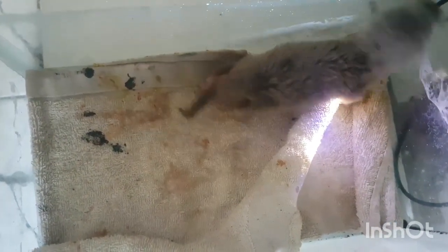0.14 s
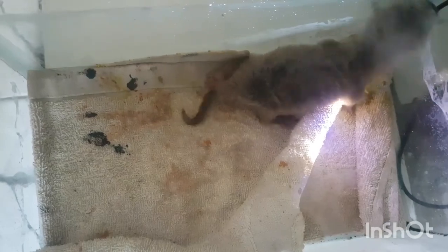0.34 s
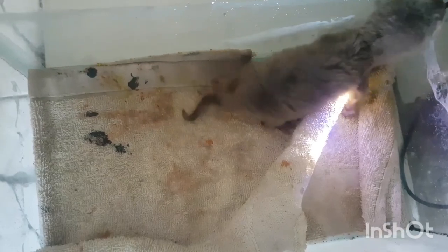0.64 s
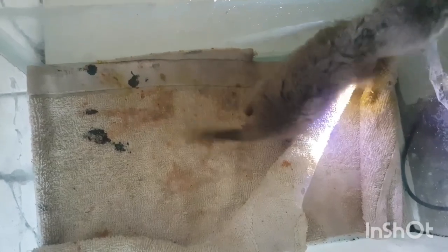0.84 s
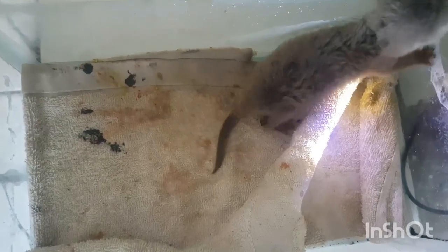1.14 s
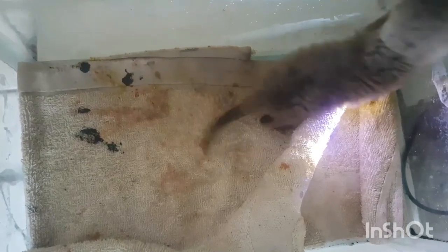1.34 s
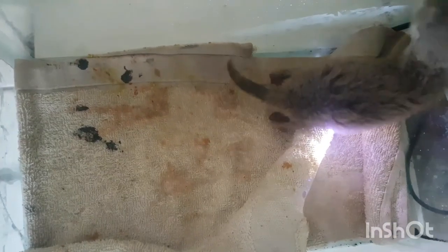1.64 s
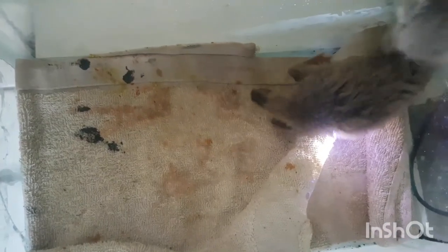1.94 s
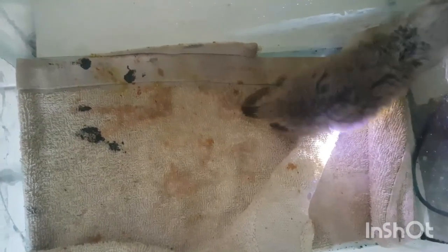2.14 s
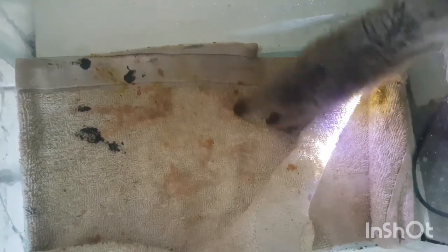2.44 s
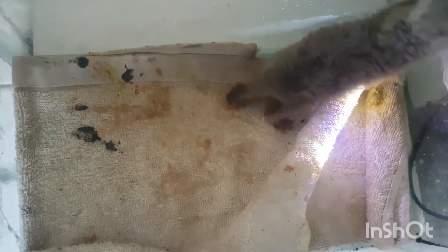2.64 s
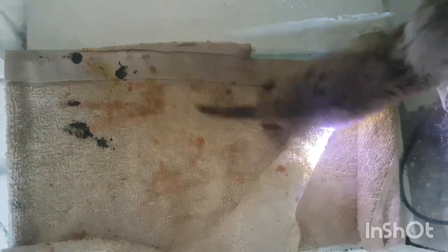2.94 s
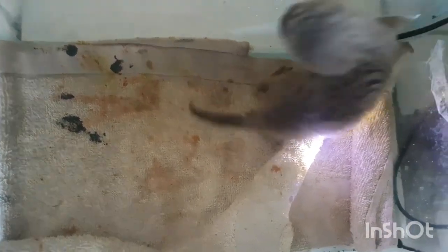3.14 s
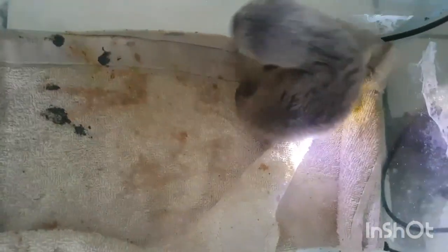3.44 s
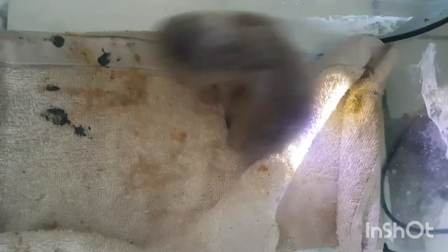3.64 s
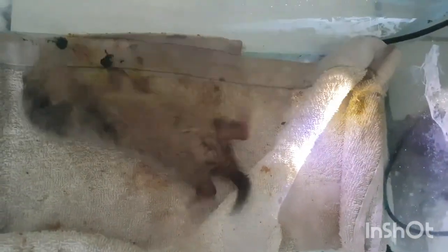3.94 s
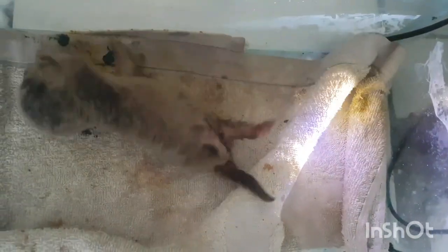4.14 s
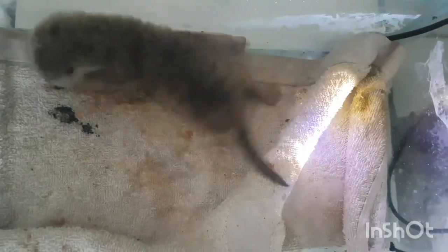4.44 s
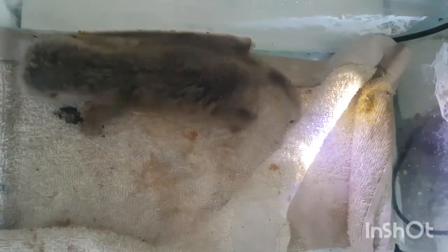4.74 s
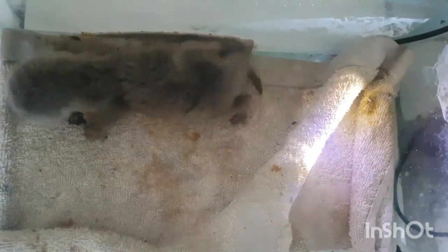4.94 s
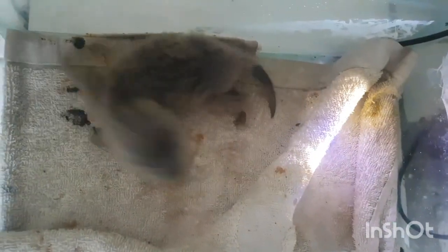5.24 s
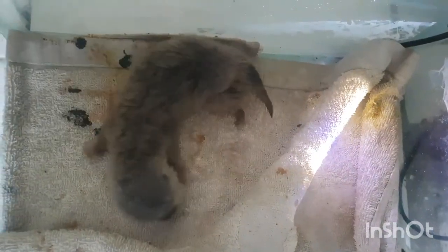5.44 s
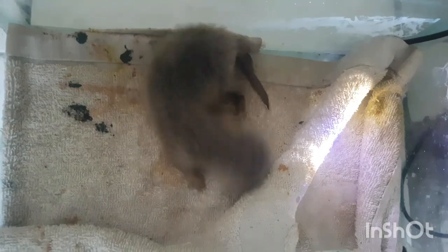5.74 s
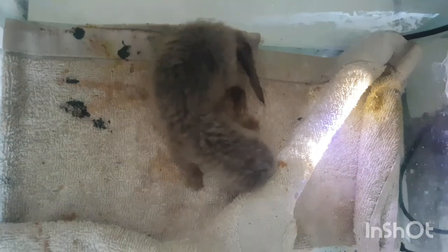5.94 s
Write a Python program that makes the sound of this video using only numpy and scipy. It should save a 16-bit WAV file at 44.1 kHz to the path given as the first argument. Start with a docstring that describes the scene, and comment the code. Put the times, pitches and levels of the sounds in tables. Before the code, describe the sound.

A low, soft room hum runs throughout. Very close, mostly right of centre, a young otter pup squeaks in a plastic tub whose walls give a short, hard ring. From 0.15 to 2.7 seconds come seven loud calls, roughly every 0.4 seconds, each 0.15 to 0.3 seconds long: a raspy start, a fast arch towards a piercing whistle, then a fall into a shrill, buzzing whine. The sixth stays lower. At 3.0 a lower, rough whine sags, and at 3.5 a fainter, deeper one fades; soft towel scuffs and dull bumps lie around 3.3 to 3.5. Tiny claw ticks come at 3.8. At 4.2 a bright squeak soars and drops, capped by a very brief loud peep, then a small bump at 4.53. Claws tick from 4.8 to 5.2. Another whistling squeak falls at 5.2, with a faint scuff at 5.4, followed by shorter squeaks at 5.55, 5.83 and 6.04, the last two hoarse.

```python
"""In a plastic tub lined with a towel, an otter pup squeaks again and again, close to the microphone.
Most squeaks start with a rasp, arch up towards a whistle and fall back into a shrill, buzzing whine:
gliding harmonics and puffs of air pass through a throat and a mouth that opens and shuts.
The tub walls reflect the voice, and shaped noise makes the low room hum, the towel scuffs with
their soft bumps, and the claw ticks."""
import sys
import numpy as np
from scipy import signal
from scipy.fft import rfft, irfft
from scipy.io import wavfile
from scipy.ndimage import uniform_filter1d

SR = 44100
rng = np.random.default_rng(int(sys.argv[2]) if len(sys.argv) > 2 else 0)


def bounce(signal):
    """Save signal as a 16-bit WAV file at the path given by the first command-line argument."""
    frames = np.transpose(np.atleast_2d(signal))
    limited = np.clip(frames, -1, 1)
    pcm = np.round(limited * 32767).astype(np.int16)
    wavfile.write(sys.argv[1], SR, pcm)


N = 268128

# room hum, relative spectrum: (f/Hz, level/dB)
ROOM = [(15, -83), (25, -29), (59, -4), (212, 1.5), (363, -12.5), (416, -10.5), (560, -18.5), (695, -16.5),
        (1480, -20.5), (2990, -22.5), (5280, -35.5), (6050, -40.5), (7920, -44.5), (9320, -46.5),
        (16000, -41)]
ROOM_DB = -47.5
# likeness of the hum left and right, below 0 counts as none: (f/Hz, likeness)
ROOM_SAME = [(60, 0.77), (180, 1), (550, 0.54), (1650, -0.46), (4970, 0.097), (15000, 0.18)]
# balance of the hum: (f/Hz, left-right level/dB)
ROOM_SIDE = [(60, -2.5), (180, -5.5), (550, -8), (1650, -10), (4970, -5.5), (15000, 5)]

# pitch curve of each squeak, from its start to its end: (t/s, f/Hz)
PITCH = [
    [(.149, 1310), (.161, 1677), (.169, 4400), (.201, 6540), (.254, 4900), (.281, 3130), (.305, 3746),
     (.35, 1812), (.379, 1536)],
    [(.538, 2360), (.551, 4700), (.563, 5485), (.603, 5190), (.645, 2668), (.668, 1918), (.689, 1660)],
    [(.875, 5520), (.888, 5990), (.924, 4980), (.955, 2416), (.972, 1969), (.998, 2450), (1.025, 1820),
     (1.06, 1509), (1.089, 1685)],
    [(1.247, 2156), (1.261, 1427), (1.286, 3835), (1.306, 3880), (1.335, 2285), (1.37, 1596), (1.423, 1410),
     (1.475, 1548), (1.517, 1392)],
    [(1.694, 1722), (1.716, 1723), (1.73, 4166), (1.762, 5260), (1.792, 4616), (1.826, 1900), (1.843, 1415),
     (1.875, 1362), (1.898, 1540)],
    [(2.054, 2168), (2.069, 1431), (2.098, 2076), (2.115, 2286), (2.145, 1646), (2.17, 1382), (2.203, 1294),
     (2.248, 1382), (2.265, 1890)],
    [(2.406, 2114), (2.42, 1450), (2.447, 1700), (2.47, 3860), (2.503, 4840), (2.545, 2083), (2.565, 1547),
     (2.605, 1395), (2.628, 1456), (2.678, 1435)],
    [(2.992, 1075), (3.028, 1002), (3.042, 842), (3.105, 892), (3.155, 598), (3.185, 850), (3.2, 806)],
    [(3.484, 836), (3.535, 650), (3.555, 659), (3.575, 467), (3.632, 419)],
    [(4.219, 1320), (4.23, 956), (4.25, 2300), (4.279, 3910), (4.291, 5000), (4.32, 5370), (4.337, 4740),
     (4.368, 2462), (4.442, 1518), (4.468, 1990)],
    [(4.469, 2700), (4.485, 2565)],
    [(5.211, 4850), (5.228, 5610), (5.277, 5250), (5.302, 3450), (5.318, 2234), (5.345, 1610), (5.38, 1324),
     (5.419, 1072)],
    [(5.551, 2018), (5.562, 1367), (5.578, 1582), (5.63, 1770), (5.678, 1323), (5.687, 1900)],
    [(5.829, 1725), (5.838, 1487), (5.885, 1460), (5.913, 1780)],
    [(6.037, 1840), (6.048, 1383), (6.062, 1580), (6.079, 1450)],
]
# voicing of each squeak: (level/dB, swell from start to end/dB, extra level in the whistle/dB,
# roughness 0-1, added roughness at the start, added roughness at the end, hoarseness 0-1,
# brightness with the mouth widest/dB, share of the length at which it is widest, topmost treble/dB,
# low resonance of a half-shut mouth/dB, mouth opening as a factor on the throat's frequencies)
SQUEAKS = [ (-21.5, 1.5, 1, 0.29, .5, 0, .03, 16.5, 0.79, -0.5, 1, 1.084),
           (-15.5, 3.5, 4, 0.22, 0.26, 0.059, 0, 22, 0.18, -1.5, 1, 1.027),
           (-17, 6, 4, 0.08, 0, 0.51, 0.15, 14, 0.17, 5, -1.5, 1),
           (-16, 2, 7, 0.05, .45, 0.2, 0, 11, 0.25, 13.5, -6, 1.01),
           (-19.5, -0.5, 1, 0.18, 0.58, 0.74, 0, 14.5, 0.62, 10, -3, 0.994),
           (-19.5, -2.5, 2, .27, 0.55, .4, 0, 8, 0.64, 7.5, -1.5, 1.025),
           (-17, 1.5, 4.5, 0.2, 0.15, 1, 0, 15, 0.17, 0, -5.5, 1.038),
           (-22.5, -5.5, 6, 0.24, 0.38, 1, 0.01, 23, 0.75, -1.5, -2.5, 1),
           (-30, -10, 0, 0.41, 0.15, 0.59, 0.02, 15, 0.12, -3, 13.5, 1.123),
           (-16.5, 1.5, 3.5, 0, 0.79, 0.57, .05, 12, 0.2, -15, -0.5, 1.053),
           (-7.5, 1, 1, 0, 0, 0, 0.1, -29, 0.6, -10, 2, 0.59),
           (-23.5, 2, 4, .14, 0, .8, 0.1, 15, 0.41, -3, 3, 1.09),
           (-22.5, -9, 4, 0.21, 0.32, 1, 0.03, 7, 1, 9, 6, 1.137),
           (-24, -6.5, -9, 0.9, 0, 0.22, 1, -13, 1, 26, 12.5, .96),
           (-20, 0.5, -6, 0.7, 0.54, 0.12, .8, 5, 1, 2, 14, 0.98), ]
# where the head points in each squeak:
# (left-right level/dB at each of the four FACING_HZ, lead of the left microphone t/ms)
FACING = [(-13.5, -12, -4.5, -10, 0), (-15, -10, -7.5, -3.5, .34), (-15, -10.5, -2, -9, .3),
          (-13.5, -12.5, -8.5, -11, -.05), (-14, -12.5, -11, -2.5, .03), (-16.5, -16.5, -4, -12, -0.34),
          (-17.5, -18, -8, -14, -.05), (-16.5, -7.5, 3, -1.5, .05), (-13, -2, -4, 3, .18),
          (-14.5, 1, 9, -2.5, .36), (-5, -5, 14, -2, .36), (-24, -6, -7, -4, .18), (-16, -7, -8, -3, .18),
          (-21, -10, 5, -2, .18), (-22, -5, -1, -4, .18)]
# frequencies of those four balances: (f/Hz)
FACING_HZ = [2000, 4260, 5700, 14200]
# colour of throat and mouth for the tone: (f/Hz, level/dB)
THROAT = [(500.0, -8), (900.0, -19), (1400.0, -17), (2250.0, -6), (2900.0, -3.5), (3500.0, -1.5),
          (4400.0, 3), (5300.0, -15), (6500.0, -12.5), (8000.0, -20), (10500.0, -17.5), (13500.0, -15),
          (15800.0, -30.5)]
# their colour for the rasp of air: (f/Hz, level/dB)
RASP = [(300, -13), (900, -4), (1200, -49.5), (1600, -4.5), (2200, 5.5), (3000, -3), (4300, 8), (5500, -6),
        (8000, -4), (10500, -9), (13500, -12), (16000, -27.5)]

# reflections from the tub walls, one list per microphone, left then right:
# (delay t/ms, gain against the direct sound)
WALLS = [
    [(.52, .4), (1.15, -.36), (1.9, .25), (3.1, .16), (4.6, -.09)],
    [(.7, .24), (1.4, .2), (2.3, -.16), (3.6, .1), (5.2, .06)],
]
# dying away of the room's tail: (f/Hz, t60/s)
RING = [(1200, 0.99), (3200, 0.64), (8400, 0.51), (15000, 0.54)]
# colour of that tail: (f/Hz, level/dB)
RING_COLOUR = [(800, -7), (1600, -4), (4500, -7), (5800, 0), (8000, -6), (13000, -20.5)]
# the shorter ring of the tub, on top of the room's tail
TUB_T60, TUB_DB = 0.25, 10  # s, dB

# scuffs of body and paws on the towel:
# (start t/s, end t/s, level/dB, dull above f/Hz, share of the time spent fading)
SCUFFS = [(3.258, 3.409, -52, 1170, 0.26), (3.398, 3.54, -55, 1120, 0.3), (4.529, 4.57, -40.5, 1300, 0.073),
          (5.423, 5.573, -46.5, 740, 0.39)]
# soft bumps of the body on the tub floor: (start t/s, end t/s, level/dB, f/Hz)
BUMPS = [(3.275, 3.376, -40.5, 184), (3.42, 3.496, -44.5, 209), (4.534, 4.559, -39, 480),
         (5.42, 5.559, -47, 171)]
GRAIN = .3  # depth of the cloth's unevenness
# claws ticking on the tub: (t/s, peak level before panning/dB, ring f/Hz, left-right level/dB)
TICKS = [(3.7973, -34.5, 1695, -11.5), (3.825, -37.5, 1830, -16), (4.8407, -31, 1760, -22),
         (4.9846, -30.5, 2770, -10), (5.0383, -36.5, 3000, -7), (5.053, -34.5, 2150, -19),
         (5.175, -36, 2970, -11)]

# upper limit of the voice's harmonics and of the recorder; where the topmost treble begins
EDGE_HZ, TOP_HZ = 15900, 12000
# unsteadiness of the folds: share of pitch at rest, share added under strain, loudness under strain
JITTER, STRAIN_JITTER, SHIMMER, LEAST_ROUGH = .004, .03, .7, .1
# spread of the upper harmonics: amount, Hz that scales it, rate as a share of the pitch
BLUR, BLUR_HZ, BLUR_RATE = .68, 1900, .3
# slower beat of the folds: depth at full hoarseness, rate as a share of the pitch
BEAT_DEPTH, BEAT_RATE = 1.7, .31
# the mouth opens and closes once a squeak: how much duller and quieter it is when shut
SHUT_DULL_DB, SHUT_QUIET_DB = 16, 1.5
# breath pressure builds and drops: dB lost at the very edge, s
BUILD_DB, BUILD_S, DROP_DB, DROP_S = 7.5, 0.024, 13, .006
# how long the folds rasp while they start and stop
START_S, STOP_S = 0.033, 0.016
# the folds catch between buzz and whistle: added roughness, pitch Hz, width in octaves, dB lost
BREAK_ROUGH, BREAK_HZ, BREAK_OCTAVES, BREAK_DB = 0.34, 2830, 0.26, 3
# about where the whistle takes over, and the share of roughness lost in it
WHISTLE_HZ, WHISTLE_CLEAN = 4700, 0.34
# share by which loudness follows the harmonics into and out of the throat's resonances
FLARE = 0.47
# extra flare of the fundamental at the throat's sharpest resonance: dB, Hz, width Hz
PEAK_DB, PEAK_HZ, PEAK_WIDTH_HZ = 2.5, 4630, 100
# slow waver of each harmonic by itself: rms dB, rate Hz
WAVER_DB, WAVER_HZ = 1.48, 35


def amp(db):
    """Decibels to gain."""
    return 10 ** (np.asarray(db) / 20)


def unit(x):
    """Scales to rms 1."""
    return x / np.sqrt(np.mean(x ** 2) + 1e-20)


def read(points, hz):
    """Reads a spectrum on a log-frequency axis."""
    f, value = np.transpose(points)
    return np.interp(np.log(hz + 1), np.log(f + 1), value)


def add(mix, s, sound):
    """Adds a stereo sound at time s."""
    part = mix[:, max(round(s * SR), 0):][:, :sound.shape[1]]
    part += sound[:, :part.shape[1]]


def sides(db):
    """Left and right gains of mean power 1 for a left-right difference in dB."""
    gains = np.array([amp(db / 2), amp(-db / 2)])
    return gains / np.sqrt(np.mean(gains ** 2, 0))


def noise(size, shape):
    """Noise of rms 1 whose spectrum follows shape(Hz)."""
    spectrum = rfft(rng.standard_normal(size))
    return unit(irfft(spectrum * shape(np.fft.rfftfreq(size, 1 / SR)), size))


def wobble(size, hz):
    """Random unsteadiness of rms 1, mostly below the given rate."""
    return noise(size, lambda f: 1 / (1 + (f / hz) ** 4))


def background():
    """Steady low room hum: shaped noise, most alike in both microphones at the low end."""
    f = np.fft.rfftfreq(N, 1 / SR)
    shared, other = (rfft(noise(N, lambda hz: amp(read(ROOM, hz)))) for _ in range(2))
    same = np.clip(read(ROOM_SAME, f), 0, 1)
    right = same * shared + np.sqrt(1 - same ** 2) * other
    hum = irfft(np.array([shared, right]) * sides(read(ROOM_SIDE, f)), N)
    return amp(ROOM_DB) * hum


def glide(points, t):
    """A smooth pitch curve through (s, Hz) points that levels off at each turn."""
    s, hz = np.transpose(points)
    y = np.log(hz)
    span = np.maximum(np.diff(s), 1e-4)
    slope = np.diff(y) / span
    before, after = np.r_[slope[0], slope], np.r_[slope, slope[-1]]
    # opposite slopes cancel, so the tangent is flat at a turn
    tangent = (before * abs(after) + abs(before) * after) / (abs(before) + abs(after) + 1e-9)
    i = np.clip(np.searchsorted(s, t) - 1, 0, len(span) - 1)
    u = (t - s[i]) / span[i]
    bend = (1 - u) * ((tangent[i] - slope[i]) * (1 - u) - (tangent[i + 1] - slope[i]) * u)
    return np.exp(y[i] + (t - s[i]) * (slope[i] + bend))


def treble(hz, corner_hz=7000):
    """Share of a frequency that belongs to the band above the corner."""
    return 1 / (1 + (corner_hz / (hz + 1)) ** 8)


def shut_mouth(hz, centre_hz=1750, width_hz=600):
    """The low resonance that takes over as the mouth closes."""
    return 1 / (1 + ((hz - centre_hz) / width_hz) ** 4)


def gesture(pitch, level_db, swell_db, whistle_db, rough, start_rough, stop_rough, bright_db, widest):
    """One push of the voice: the mouth arches open and shut; folds rasp at both ends and in the break."""
    t = np.arange(pitch[0][0], pitch[-1][0], 1 / SR)
    since, until = t - t[0], t[-1] - t
    progress = np.linspace(0, 1, len(t))
    hz = glide(pitch, t)
    widest = np.clip(widest, .05, .95)
    shut = 1 - np.sin(np.pi / 2 * np.interp(progress, [0, widest, 1], [0, 1, 2]))
    breaking = np.exp(-(np.log2(hz / BREAK_HZ) / BREAK_OCTAVES) ** 2)
    whistling = treble(hz, WHISTLE_HZ)
    level_db = level_db + swell_db * (progress - .5) - SHUT_QUIET_DB * (shut - shut.mean())
    level_db += whistle_db * whistling - BREAK_DB * breaking
    level_db -= BUILD_DB * np.exp(-since / BUILD_S) + DROP_DB * np.exp(-until / DROP_S)
    rough = rough + start_rough * np.exp(-(since / START_S) ** 2)
    rough += stop_rough * np.exp(-(until / STOP_S) ** 2)
    rough = (rough + BREAK_ROUGH * breaking) * (1 - WHISTLE_CLEAN * whistling)
    return t, hz, level_db, rough, bright_db - SHUT_DULL_DB * shut


def skirts(size, count, hz):
    """Complex random flutter, its own for each harmonic, mostly below the given rate."""
    return np.array([wobble(size, hz) + 1j * wobble(size, hz) for _ in range(count)]) / np.sqrt(2)


def harmonic_levels(k, hz, mouth, slope_db=-3.0):
    """Gain of each harmonic as it glides through the resonances of throat and mouth."""
    bright_db, top_db, shut_db, opening = mouth
    line_hz = k * hz
    mouth_db = bright_db * treble(line_hz) + top_db * treble(line_hz, TOP_HZ)
    mouth_db = mouth_db + shut_db * shut_mouth(line_hz / opening)
    lines = amp(read(THROAT, line_hz / opening) + slope_db * np.log2(k) + mouth_db)  # slope per octave
    lines *= np.clip((EDGE_HZ - line_hz) / 500 + 1, 0, 1)
    # only part of the loudness change through the resonances is kept
    passed = np.sqrt((lines ** 2).sum(0) / 2)
    lines *= unit(passed ** FLARE) / passed
    lines[0] *= amp(PEAK_DB * np.exp(-((hz - PEAK_HZ) / PEAK_WIDTH_HZ) ** 2))
    return lines * amp(WAVER_DB * np.array([wobble(len(hz), WAVER_HZ) for _ in k]))


def fold_buzz(hz, phase, rough, hoarse, mouth, aim, shimmer_hz=260, spread=0.35):
    """Tiny vocal folds give a stack of harmonics; strain blurs them and hoarseness adds a beat."""
    size = len(hz)
    k = np.arange(1, int(EDGE_HZ / hz.min()) + 2)[:, None]
    line_hz = k * hz
    lines = harmonic_levels(k, hz, mouth)
    # uneven closures spread each harmonic into a band, the higher ones most
    blur = np.tanh(BLUR * rough * np.minimum(k - .5, line_hz / BLUR_HZ))
    unsteady = np.sqrt(1 - blur ** 2) + blur * skirts(size, len(k), BLUR_RATE * np.median(hz))
    partials = (unsteady * np.exp(1j * (k * phase - spread * k ** 2))).real
    # a hoarse voice beats at a fraction of its pitch: side lines flank the overtones
    beat = BEAT_DEPTH * hoarse * np.minimum(k / 3, 1) ** 2
    beating = 1 + beat * np.cos(BEAT_RATE * phase + wobble(size, shimmer_hz / 2))
    partials *= beating / np.sqrt(1 + beat ** 2 / 2)
    tone = (sides(read(aim, line_hz)) * lines * partials).sum(1)
    flutter = SHIMMER * np.minimum(rough, .5)
    return tone * (1 + flutter * wobble(size, shimmer_hz)) / np.sqrt(1 + flutter ** 2)


def breath_rasp(phase, mouth, aim, gating=0.41):
    """Air escapes in one puff of noise a cycle and passes the same mouth."""
    bright_db, top_db, shut_db, opening = mouth
    size = len(phase)
    f = np.fft.rfftfreq(size, 1 / SR)
    puffs = rfft(rng.standard_normal(size) * (1 + gating * np.cos(phase)))
    puffs = puffs * amp(read(RASP, f / opening) + top_db * treble(f, TOP_HZ)) * sides(read(aim, f))
    # the moving mouth raises or lowers its bands over time
    rasp = irfft(puffs, size) + (amp(bright_db) - 1) * irfft(puffs * treble(f), size)
    rasp += (amp(shut_db) - 1) * irfft(puffs * shut_mouth(f / opening), size)
    # evened out over 400 samples
    return rasp / np.sqrt(uniform_filter1d((rasp ** 2).mean(0), size=400))


def squeak(pitch, voicing, facing, jitter_hz=450, air=0.94, air_power=1.49,
           lips_db=13, lips_s=0.018, rise_s=0.0015, fall_s=0.0033):
    """Folds buzz through the throat; strain makes their cycles uneven and lets puffs of air through."""
    (level_db, swell_db, whistle_db, rough, start_rough, stop_rough, hoarse,
     bright_db, widest, top_db, shut_db, opening) = voicing
    *aim_db, lead_ms = facing
    aim = list(zip(FACING_HZ, aim_db))
    t, hz, level_db, rough, bright_db = gesture(
        pitch, level_db, swell_db, whistle_db, rough, start_rough, stop_rough, bright_db, widest)
    rough = np.clip(np.maximum(rough, hoarse), LEAST_ROUGH, 1)
    since, until = t - t[0], t[-1] - t
    # the mouth is still half shut as a squeak starts and ends
    shut_db = shut_db + lips_db * np.exp(-(np.minimum(since, until) / lips_s) ** 2)
    mouth = bright_db, top_db, shut_db, opening
    jitter = (JITTER + STRAIN_JITTER * rough ** 2) * wobble(len(t), jitter_hz)
    phase = 2 * np.pi * np.cumsum(hz * (1 + jitter)) / SR
    tone = fold_buzz(hz, phase, rough, hoarse, mouth, aim)
    rasp = breath_rasp(phase, mouth, aim)
    share = np.clip(air * rough ** air_power, .06, .7)
    edges = np.clip(since / rise_s, 0, 1) * np.clip(until / fall_s, 0, 1)
    left, right = amp(level_db) * edges * (np.sqrt(1 - share ** 2) * tone + share * rasp)
    return t[0], np.array([np.roll(left, -round(lead_ms * SR / 1000)), right])


def tub(x):
    """Near walls comb the sound, so that a gliding tone flutters."""
    out = np.zeros((2, N))
    for channel, walls in enumerate(WALLS):
        taps = np.zeros(SR // 100)
        taps[0] = 1
        for ms, gain in walls:
            taps[round(ms * SR / 1000)] += gain
        out[channel] = signal.oaconvolve(x[channel], taps / np.linalg.norm(taps))[:N]
    return out


def reverb(x, wet_db=-21, side_db=-4):
    """A quick ring of the tub over the room's tail, whose bands each die at their own speed."""
    hz, t, grains = signal.stft(rng.standard_normal((2, SR * 3 // 4)), SR, nperseg=256)
    room_fade = amp(read(RING_COLOUR, hz)[:, None] - 60 * t / read(RING, hz)[:, None])
    tub_fade = amp(TUB_DB - 60 * t / TUB_T60)
    tail = signal.istft(grains * (room_fade + tub_fade), SR, nperseg=256)[1]
    tail[:, :SR // 200] = 0  # the tail waits 5 ms
    tail /= np.linalg.norm(tail[0])
    # the right channel feeds both tails
    wet = signal.fftconvolve(x[1:], tail, axes=1)[:, :N]
    return amp(wet_db) * sides(side_db)[:, None] * wet


def towel(grain_hz=250, low_hz=300, bump_width_hz=35, side_db=-9, bump_side_db=-4):
    """Cloth catches and slips under the pup as grainy noise; its weight bumps the tub floor."""
    out = np.zeros((2, N))
    for start, end, db, dull_hz, fading in SCUFFS:
        size = round((end - start) * SR)
        rub = noise(size, lambda f: f ** 2 / (f ** 2 + low_hz ** 2) / (1 + (f / dull_hz) ** 2))
        rub *= np.exp(GRAIN * wobble(size, grain_hz))
        rub = unit(rub * signal.windows.tukey(size, fading))
        add(out, start, amp(db) * sides(side_db)[:, None] * rub)
    for start, end, db, hz in BUMPS:
        size = round((end - start) * SR)
        bump = noise(size, lambda f: 1 / (1 + ((f - hz) / bump_width_hz) ** 2))
        bump = unit(bump * signal.windows.tukey(size, .5))
        add(out, start, amp(db) * sides(bump_side_db)[:, None] * bump)
    return out


def claws(decay_s=0.0017, snap=0.2, snap_hz=3000):
    """Each tick is a short burst that rings the plastic briefly; higher ones snap into the treble."""
    out = np.zeros((2, N))
    t = np.arange(SR // 30) / SR
    for s, db, hz, side_db in TICKS:
        def colour(f):
            """A broad ring plus a treble snap that grows steeply with the ring's pitch."""
            ring = 1 / (1 + ((f - hz) / hz * 1.3) ** 4)
            return (snap * (hz / snap_hz) ** 5 + ring) * f / (f + hz / 2)

        tick = noise(len(t), colour) * np.exp(-t / decay_s)
        add(out, s, amp(db) * sides(side_db)[:, None] * tick / abs(tick).max())
    return out


def scene():
    """The pup in its tub, in the room."""
    voice = np.zeros((2, N))
    for pitch, voicing, facing in zip(PITCH, SQUEAKS, FACING):
        add(voice, *squeak(pitch, voicing, facing))
    near = tub(voice) + towel() + claws()
    return background() + near + reverb(near)


def record(dry):
    """The loudest peaks are rounded off; then the recorder's band limit takes the top treble."""
    rounded = dry / (1 + (dry / .85) ** 4) ** .25
    band_limit = signal.firwin(511, EDGE_HZ, window=("kaiser", 9), fs=SR)
    return signal.oaconvolve(rounded, band_limit[None], "same")


dry = scene()
out = record(dry)
bounce(out)
```